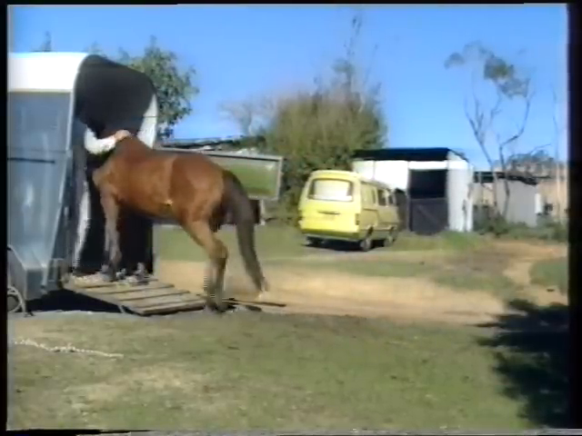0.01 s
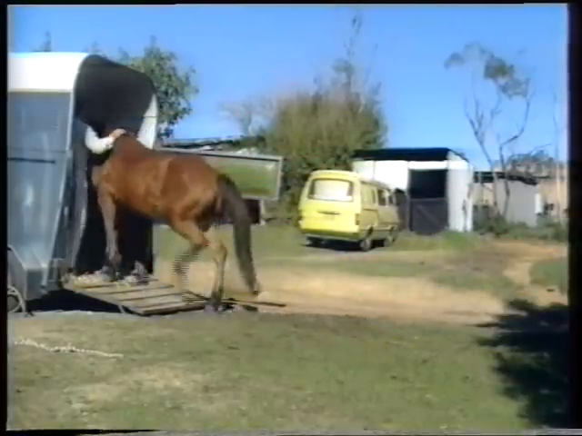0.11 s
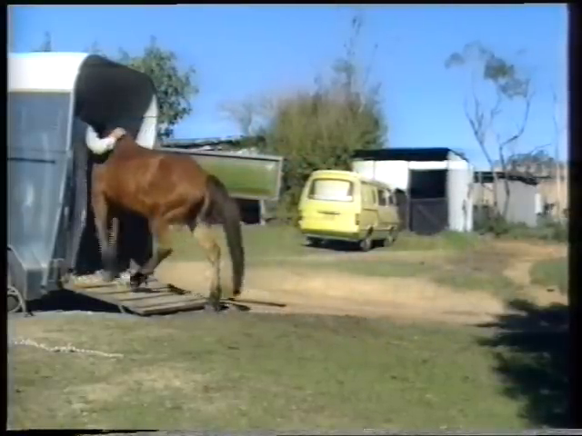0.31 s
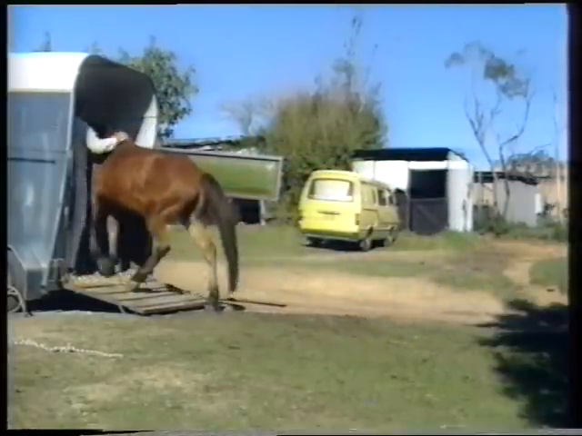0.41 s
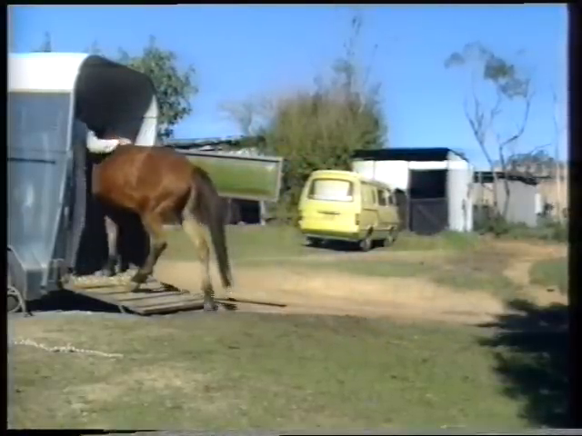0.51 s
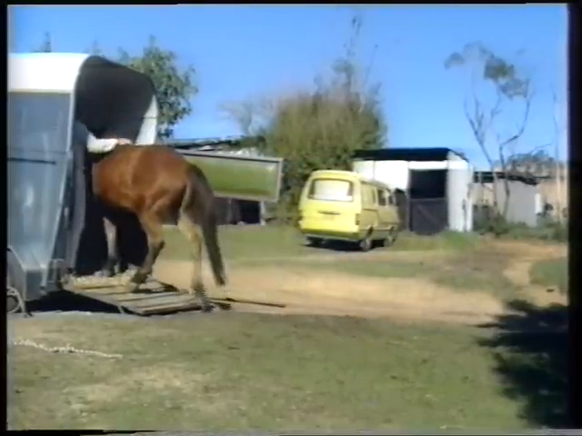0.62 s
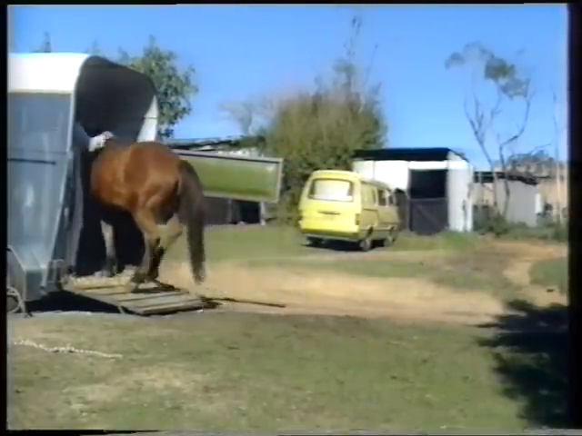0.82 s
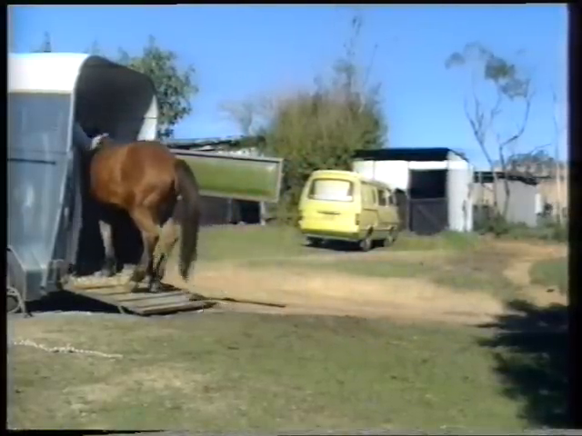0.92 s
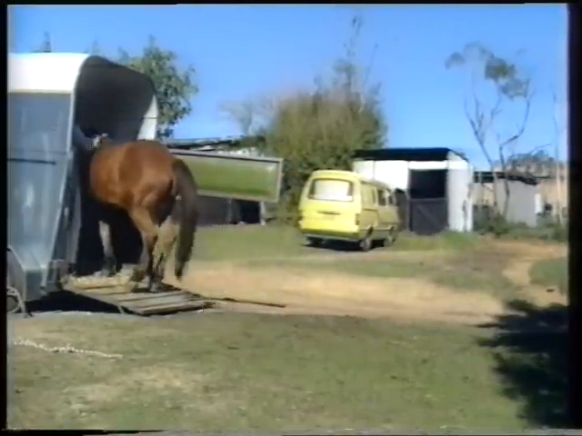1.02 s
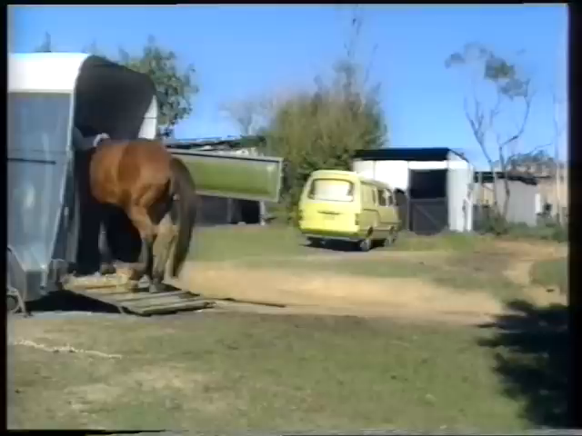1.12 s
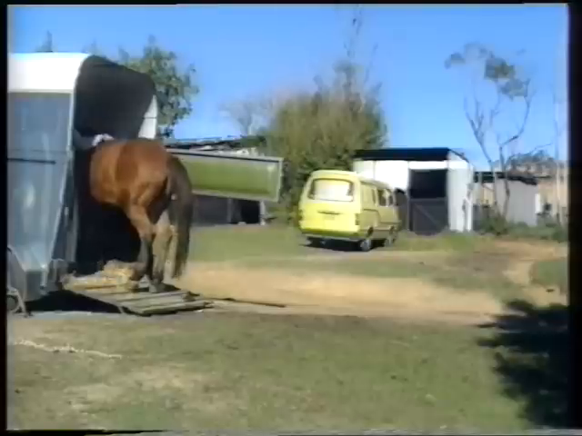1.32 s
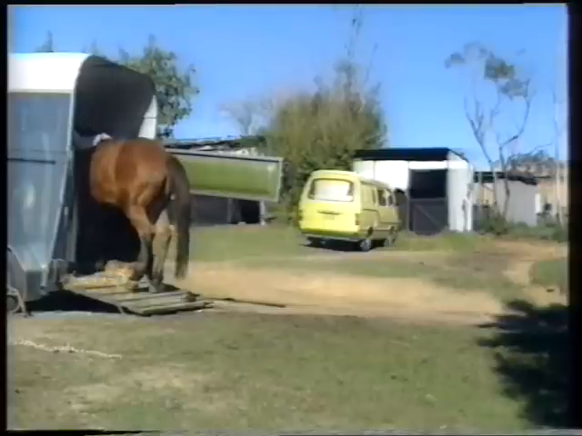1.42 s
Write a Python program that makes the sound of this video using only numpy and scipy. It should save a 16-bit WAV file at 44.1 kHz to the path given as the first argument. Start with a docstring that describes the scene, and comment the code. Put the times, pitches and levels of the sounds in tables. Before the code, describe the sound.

Horse hooves on a wooden trailer ramp: soft knocks, a heavy cracking boom, lighter steps, a second deep thud on the floor, then small knocks and a gritty scrape; outdoors, distant microphone with faint hiss.

```python
"""Across a yard, a horse walks up a wooden ramp into a trailer.
Two heavy hoof falls boom through the boards (fading sine tones) and set the hollow trailer rumbling
(slowly fading bands of noise). Lighter steps knock, loose planks crack, clonk and creak,
and hooves scuff and scrape on grit (bursts of uneven noise).
Underneath lie faint outdoor air and hiss (shaped noise), a steady high whistle and a fuzzy whine."""
import sys
import numpy as np
from scipy import signal
from scipy.fft import rfft, irfft
from scipy.io import wavfile

SR = 44100
rng = np.random.default_rng(int(sys.argv[2]) if len(sys.argv) > 2 else 0)


def to_wav(sig):
    """Store sig (one row per channel, or 1-D mono) as 16-bit WAV at the path in sys.argv[1].

    Samples outside -1..1 are clipped; the rate is SR.
    """
    pcm = np.clip(np.atleast_2d(sig), -1, 1) * 32767
    pcm = np.round(pcm).astype(np.int16)
    wavfile.write(sys.argv[1], SR, pcm.T)  # frames by channels


N = 66150  # length of the scene in samples: 1.5 s

# "Ring time" is the time a sound takes to die away by 60 dB.
# Colour tables give only the balance between pitches; loudness is set elsewhere.

# Outdoor air and hiss, colour: (frequency [Hz], level [dB per Hz])
AIR_COLOUR = [(20, -5), (50, -1), (90, 8.5), (160, 4.5), (240, 2), (450, -6), (1000, -9.5), (2000, -21.5),
              (4000, -23), (9000, -23.5), (14000, -26), (16000, -23)]
AIR_DB = -49.5
# Fuzzy whine: (frequency [Hz], spread to each side [Hz], level [dB])
WHINE = [(15600, 190, -59), (11650, 130, -74)]
WHISTLE_HZ, WHISTLE_DB = 15625, -61
# Air that differs between the two ears, colour: (frequency [Hz], level [dB per Hz])
SIDE_AIR_COLOUR = [(30, 16), (120, 13), (300, 6), (1000, -13), (3000, -27), (8000, -4), (12000, 0),
                   (14500, 0), (15600, 14), (16000, -1)]
SIDE_AIR_DB = -68
# Lean of the whole scene to the left: (frequency [Hz], left minus right [dB])
LEFT_LEAN = [(30, 0.5), (120, 2), (300, 1.82), (1000, 1.33), (2000, 0.7), (8000, 1.5), (14000, 1.5)]

# Hoof scraping the floor, colour: (frequency [Hz], level [dB per Hz])
SCRAPE_COLOUR = [(300, -7), (1000, -5), (1370, 1), (1800, -9), (2250, 3), (2650, -3.5), (3200, -10.5),
                 (12000, -33)]
SCRAPE_START_S, SCRAPE_DB, SCRAPE_RISE_S, SCRAPE_FADE_S = 1.154, -36, 0.013, 0.16
SLIPS_PER_S = 2200  # on average

# Hooves dragging on grit: (time [s], level [dB], time to fade by 60 dB [s])
SCUFFS = [(0.249, -51.5, 1), (0.429, -49.5, 0.13), (0.603, -45, 0.18), (0.755, -46, 0.021),
          (1.115, -59, 0.49), (1.217, -47.5, 0.094)]
# Crushed grit, colour: (frequency [Hz], level [dB per Hz])
GRIT_COLOUR = [(500, -6), (2000, -6), (5000, 2.5), (9000, 4), (12000, -1.5), (16000, -19)]
GRAIN_DB = 3.5  # how unequal the grains are
GRIT_RISE_S, STOMP_GRIT_FADE_S = 0.0076, 0.053

# Lighter steps and knocks, before halving:
# (time [s], bass [dB], middle [dB], treble [dB], ring time factor [times])
KNOCKS = [(0.0, -37.5, -41, -49.5, 3), (0.047, -52, -33.5, -48.5, 1.32), (0.125, -62, -45.5, -50, 6),
          (0.336, -32, -35, -52, 0.55), (0.418, -41, -36, -55, 1.8), (0.528, -34.5, -42.5, -49.5, 2),
          (0.554, -34.5, -38.5, -70, 2.9), (0.603, -31.5, -27.5, -38.5, 1.93),
          (0.616, -31, -25.5, -50, 1.36), (0.69, -36, -34, -55, 3.4), (0.895, -27, -19, -66, 0.95),
          (0.928, -30.5, -31, -44, 1.7), (0.966, -21, -24.5, -51.5, 1.17), (1.052, -33, -33.5, -54, 5.1),
          (1.119, -35.5, -32.5, -36, 1.34), (1.161, -40, -30.5, -47, 1.35), (1.217, -33, -44, -51, 1),
          (1.268, -44, -34.5, -65, 0.75), (1.306, -38, -39, -64, 1.3), (1.445, -47, -52, -80, 1.4)]
# Ring of a light knock: (frequency [Hz], level [dB per band], ring time [s])
KNOCK_RING = [(30.4, -63, 0.11), (58, -12, 0.046), (99, -8, 0.29), (147, -10, 0.23), (217, 1.5, 0.27),
              (403, -9, 0.29), (830, -2.5, 0.12), (1210, -6, 0.25), (2380, -8.5, 0.17), (4940, -13, 0.15),
              (14000, -53, .1)]
BASS_HZ, MID_HZ, TREBLE_HZ = 235, 763, 2510
# Planks flexing under the horse's weight: (time [s], frequency [Hz], level [dB], length [s])
FLEXES = [(0.336, 222, -21.5, 0.06), (0.627, 97, -26, 0.07), (0.645, 237.5, -29, 0.04),
          (0.68, 231.8, -31, 0.081), (1.162, 215, -23.5, 0.042)]

# Sharp cracks of hoof and loose planks: (time [s], crack peak [dB], rattle [dB])
CRACKS = [(0.2179, -10.5, -22), (0.2200, -9.5, -21), (0.2255, -7, -26), (0.2327, -6.5, -21.5),
          (0.2440, -10, -25), (0.252, -16, -29), (0.2623, -15.5, -25), (0.8196, -22, -35),
          (0.828, -17.5, -26.5), (0.8344, -28, -38), (0.8483, -21, -37), (0.899, -25.5, -45),
          (0.971, -30, -37), (1.120, -36, -37)]
# A crack, colour: (frequency [Hz], level [dB per Hz])
CRACK_COLOUR = [(60, -11), (300, 4), (600, 5), (900, 9), (1700, -1), (2600, -10.5), (4500, -23.5),
                (9000, -28), (15000, -55)]
# Loose plank rattling at every crack: (frequency [Hz], level [dB], ring time [s])
RATTLE_TONES = [(988, -2.5, 0.072), (1126, -7.5, 0.02), (1271, -2.5, 0.047), (1384, -4.5, 0.057),
                (1580, -5, 0.042), (1766, -4.5, 0.033), (1970, -8.5, 0.024), (2366, -9, 0.022)]
# Loose planks touched by a hoof: (time [s], level [dB], plank [name])
CLONKS = [(0.2182, -14, "ramp lip"), (0.420, -28.5, "ramp edge"), (0.602, -36, "ramp lip"),
          (0.615, -27.5, "ramp middle"), (0.826, -17, "ramp middle"), (0.924, -25.5, "ramp edge"),
          (1.119, -32.5, "sill"), (1.158, -30.5, "floor plank"), (1.220, -34, "ramp lip")]
# Tones of each of those planks, by name: (frequency [Hz], level [dB], ring time [s])
PLANK_TONES = {"ramp lip": [(608, -8, 0.06), (879, 2.5, 0.057), (1001, -3, 0.047)],
               "ramp edge": [(717, -2.5, 0.13), (1060, -11, 0.14)], "ramp middle": [(535, -2, 0.12),
               (629.4, -4.5, 0.086), (750, -12, 0.096), (951, -7, 0.074), (1165, -3, 0.041)],
               "sill": [(473, -6, 0.4), (680, -1.5, 0.33), (930, -5, 0.14), (1344, -6, 0.094),
               (2290, -25, 0.18)], "floor plank": [(443.4, -0.5, 0.22), (1354, -7, 0.093),
               (2600, -20, 0.29), (3800, -21, 0.17)]}
# Faint creaks of the ramp: (time [s], frequency [Hz], spread to each side [Hz], level [dB], length [s])
CREAKS = [(0.522, 2280, 110, -59.5, 0.05), (0.885, 3050, 910, -48.5, 0.05), (1.114, 5350, 1100, -56, 0.055)]

# Heavy hoof falls, clatter before halving: (time [s], boom [dB], clatter [dB],
# clatter tilt [dB per octave], grit [dB], board struck [name])
STOMPS = [(0.218, -13, -20.5, -1.5, -36, "ramp"), (0.820, -12, -22, -3.5, -44.5, "floor")]
# Toe lands first, then the hoof rolls flat: (delay [s], level [dB])
HOOF_ROLL = [(0, 5), (.007, -5), (0.0127, 1.5), (.026, -3), (.043, -8.5)]
# Tones of each struck board, by name: (frequency [Hz], level [dB], ring time [s])
BOARD_TONES = {"ramp": [(83.6, -7.5, 0.36), (117.7, -0.6, 0.3), (145, 9.5, 0.21), (169, -10.2, 0.46),
               (174.9, -2.5, 0.5), (213.2, -0.6, 0.46), (224.4, -1.4, 0.51), (263.2, 8, 0.23),
               (282.7, 7, 0.11), (310.3, -9.0, 0.45), (346, -3.5, 0.22), (476, -7.4, 0.344),
               (511, 2, 0.059), (670, -9.5, 0.11)], "floor": [(85, 1, 0.17), (118.2, 8, 0.25),
               (144.8, 7.5, 0.22), (178.7, -26, 0.55), (224.7, -2.5, 0.51), (232.9, -8.5, 0.39),
               (257.3, 3.5, 0.18), (279.3, -2, 0.42), (350.7, -6.5, 0.37), (431.5, -10, 0.25),
               (494, -8.5, 0.3), (628.6, -10, 0.26), (765, -5.5, 0.17), (815, -0.5, 0.086)]}
# Dense ring of the planks: (frequency [Hz], level [dB per band], ring time [s])
WOOD_RING = [(30, -42, 0.15), (61.3, -44, 0.089), (113, -34, 0.24), (240, -10, 0.29), (460, -6, 0.24),
             (900, -7, 0.25), (1700, -22.5, 0.11), (3430, -18.5, 0.14), (6940, -24, 0.048),
             (14000, -28, 0.051)]
# Ring of the hollow trailer shell: (frequency [Hz], level [dB per band], ring time [s])
SHELL_RING = [(31.2, -57, 0.89), (85, -8.5, 1.37), (144, -0.5, 0.62), (226, -0.5, 1.074), (474, -6.5, 0.74),
              (920, -6.5, 0.73), (1930, -18, 0.81), (4813, -33.5, 0.99), (13900, -70, 0.66)]
SHELL_DB = -29.5
# Lower notes build up more slowly: rise times counted in cycles
SWELL_CYCLES, BOOM_RISE_CYCLES = 0.55, 3.27
LOW_CUT_HZ = 52  # the boards radiate little below this
EDGE_HZ, CEILING = 16000, 0.8  # top of the treble, and the limit of the soft rounding


def amp(db):
    """Turns decibels into a gain, where every 20 dB is ten times the amplitude."""
    return 10 ** (np.asarray(db) / 20)


def unit(x):
    """Scales a signal to an average (rms) strength of one."""
    return x / np.sqrt(np.mean(x ** 2) + 1e-20)


def read(points, hz, axis=1):
    """Reads between the rows of a table, with pitch on a logarithmic scale as we hear it."""
    columns = np.transpose(points)
    return np.interp(np.log(hz + 1), np.log(columns[0] + 1), columns[axis])


def add(mix, s, sound):
    """Mixes a sound in at a time in seconds, cutting off what runs past the end."""
    part = mix[max(round(s * SR), 0):][:len(sound)]
    part += sound[:len(part)]


def colour(x, points):
    """Balances the pitches of a full-length signal by a colour table, at unit strength."""
    gain = amp(read(points, np.fft.rfftfreq(N, 1 / SR)))
    return unit(irfft(rfft(x) * gain, N))


def narrow(hz, spread):
    """Noise squeezed into a narrow band, heard as a wavering tone."""
    f = np.fft.rfftfreq(N, 1 / SR)
    bell = np.exp(-((f - hz) / spread) ** 2)
    return unit(irfft(rfft(rng.standard_normal(N)) * bell, N))


def rise_and_fade(rise, fade):
    """Swells with time constant rise (s), while dying away by 60 dB every fade seconds."""
    t = np.arange(N) / SR
    return (1 - np.exp(-t / rise)) * np.exp(-np.log(1000) * t / fade)


def tones(table):
    """A struck board's strong notes: sines that swell over a few cycles and die at their own speeds."""
    t, out = np.arange(N) / SR, np.zeros(N)
    for hz, db, ring_time in table:
        note = np.sin(2 * np.pi * hz * t)
        out += amp(db) * note * rise_and_fade(BOOM_RISE_CYCLES / hz, ring_time)
    return out


def ring(table, shade=None, length=1):
    """Notes too crowded to tell apart: half-octave bands of noise, each dying at its own speed."""
    octave = np.log2(np.fft.rfftfreq(N, 1 / SR) + 1)
    noise = rfft(rng.standard_normal(N))
    out = np.zeros(N)
    for hz in np.geomspace(31.25, 16000, 19):
        # neighbouring bands overlap smoothly
        half_octaves_away = np.clip(2 * (octave - np.log2(hz)), -1, 1)
        band = irfft(noise * np.cos(np.pi / 2 * half_octaves_away) ** 2)
        env = rise_and_fade(SWELL_CYCLES / hz, length * read(table, hz, axis=2))
        db = read(table, hz)
        if shade:
            db = db + read(shade, hz)
        # even out the random strength of the noise, but keep that of the envelope
        out += amp(db) * unit(band * env) * np.sqrt(np.mean(env ** 2))
    return out


def grit(fade):
    """Sand crushed under a hoof: a fading burst of tiny grains of uneven strength."""
    unevenness = np.minimum(rng.exponential(1, N), 4)
    grains = rng.standard_normal(N) * amp(GRAIN_DB * unevenness)
    return colour(grains, GRIT_COLOUR) * rise_and_fade(GRIT_RISE_S, fade)


def background():
    """Shaped noise for air and hiss, a pure sine whistle, and narrow noise bands for the whine."""
    air = amp(AIR_DB) * colour(rng.standard_normal(N), AIR_COLOUR)
    whistle = amp(WHISTLE_DB) * np.sin(2 * np.pi * WHISTLE_HZ * np.arange(N) / SR)
    whine = sum(amp(db) * narrow(hz, spread) for hz, spread, db in WHINE)
    return air + whistle + whine


def side_air():
    """Faint noise that is opposite in the two ears, so it sounds wide."""
    return amp(SIDE_AIR_DB) * colour(rng.standard_normal(N), SIDE_AIR_COLOUR)


def scrape():
    """A hoof sticks and slips over the gritty floor: random clicks of uneven strength."""
    out = np.zeros(N)
    slips = (rng.random(N) < SLIPS_PER_S / SR) * rng.standard_normal(N)
    sound = colour(slips, SCRAPE_COLOUR) * rise_and_fade(SCRAPE_RISE_S, SCRAPE_FADE_S)
    add(out, SCRAPE_START_S, amp(SCRAPE_DB) * sound)
    return out


def scuffs():
    """Hooves drag on grit and crush it in short bursts."""
    out = np.zeros(N)
    for s, db, fade in SCUFFS:
        add(out, s, amp(db) * grit(fade))
    return out


def flexes():
    """Planks bend under the horse's weight: short low tones that swell and sink."""
    out = np.zeros(N)
    for s, hz, db, length in FLEXES:
        t = np.arange(0, length, 1 / SR)
        swell = np.sin(np.pi * t / length) ** 2
        add(out, s, amp(db) * swell * np.sin(2 * np.pi * hz * t))
    return out


def knocks():
    """Lighter steps set the wood ringing, each with its own tone balance and length."""
    out = np.zeros(N)
    for s, bass_db, mid_db, treble_db, length in KNOCKS:
        shade = [(BASS_HZ, bass_db), (MID_HZ, mid_db), (TREBLE_HZ, treble_db)]
        add(out, s, 0.5 * ring(KNOCK_RING, shade, length))
    return out


def creaks():
    """The ramp creaks faintly: narrow noise that swells and sinks."""
    out = np.zeros(N)
    for s, hz, spread, db, length in CREAKS:
        t = np.arange(0, length, 1 / SR)
        swell = np.sin(np.pi * t / length)
        add(out, s, amp(db) * swell * narrow(hz, spread)[:len(t)])
    return out


def clonks():
    """Loose planks ring with their own few notes when a hoof touches them."""
    out = np.zeros(N)
    for s, db, plank in CLONKS:
        add(out, s, amp(db) * tones(PLANK_TONES[plank]))
    return out


def cracks():
    """Hoof meets loose plank: a sharp click, and the same plank rattling each time."""
    out = np.zeros(N)
    log_gain = np.log(amp(read(CRACK_COLOUR, abs(np.fft.fftfreq(2 ** 11, 1 / SR)))))
    # minimum phase: packs the click's energy as early as its colour allows
    crack = np.fft.ifft(np.exp(np.conj(signal.hilbert(log_gain)))).real
    crack = crack / abs(crack).max()
    rattle = tones(RATTLE_TONES)
    for s, crack_db, rattle_db in CRACKS:
        add(out, s, amp(crack_db) * crack)
        add(out, s, amp(rattle_db) * rattle)
    return out


def stomps():
    """Each heavy hoof booms the board, sets the trailer ringing and clatters as it rolls flat."""
    out = np.zeros(N)
    for s, boom_db, clatter_db, tilt_db, grit_db, board in STOMPS:
        add(out, s, amp(boom_db) * tones(BOARD_TONES[board]))
        add(out, s, amp(SHELL_DB) * ring(SHELL_RING))
        # the tilt makes the clatter duller or brighter
        shade = [(hz, tilt_db * np.log2(hz / MID_HZ)) for hz in (BASS_HZ, TREBLE_HZ)]
        for delay, db in HOOF_ROLL:
            clatter = 0.5 * amp(clatter_db) * ring(WOOD_RING, shade)
            crushed = amp(grit_db) * grit(STOMP_GRIT_FADE_S)
            add(out, s + delay, amp(db) * (clatter + crushed))
    return out


def scene():
    """Mixes all sounds nearly in mono, leaning slightly left by an amount that varies with pitch."""
    low_cut = signal.butter(2, LOW_CUT_HZ, "highpass", fs=SR, output="sos")
    boards = signal.sosfiltfilt(low_cut, stomps() + cracks() + clonks() + creaks())
    light_steps = knocks() + flexes() + scuffs()
    mono = rfft(boards + light_steps + scrape() + background())
    lean_db = read(LEFT_LEAN, np.fft.rfftfreq(N, 1 / SR))
    side = side_air()
    left = irfft(mono * amp(lean_db / 2), N) + side
    right = irfft(mono * amp(-lean_db / 2), N) - side
    return np.array([left, right])


def record(dry):
    """Rounds off the loudest peaks softly, then removes the highest treble."""
    rounded = CEILING * np.tanh(dry / CEILING)
    treble_cut = signal.firwin(511, EDGE_HZ, window=("kaiser", 9), fs=SR)
    return signal.oaconvolve(rounded, treble_cut[None], "same")


dry = scene()
out = record(dry)
to_wav(out)
```